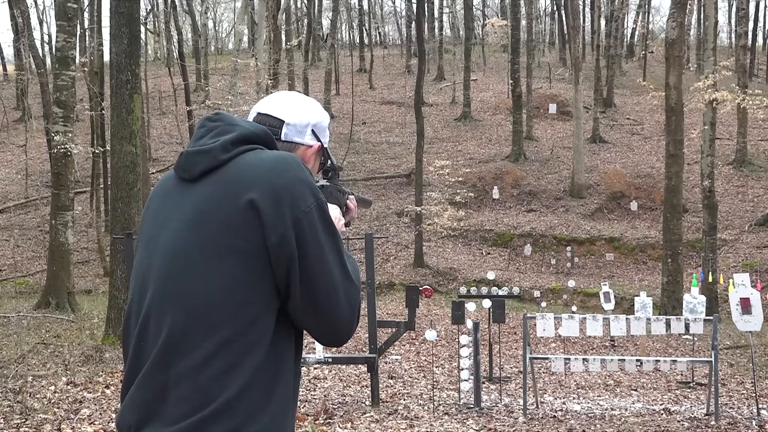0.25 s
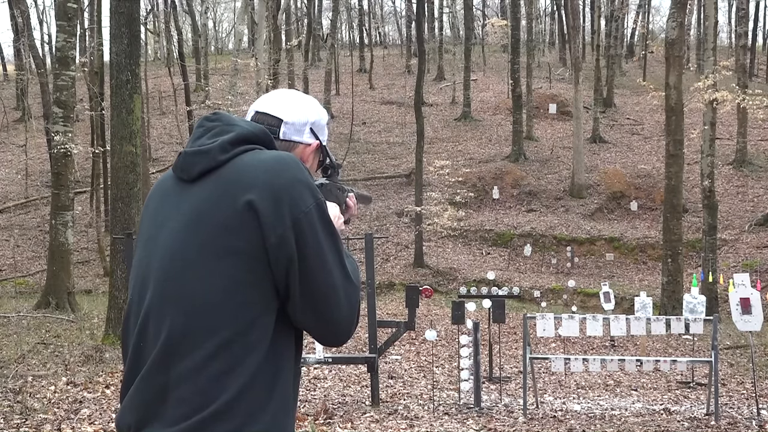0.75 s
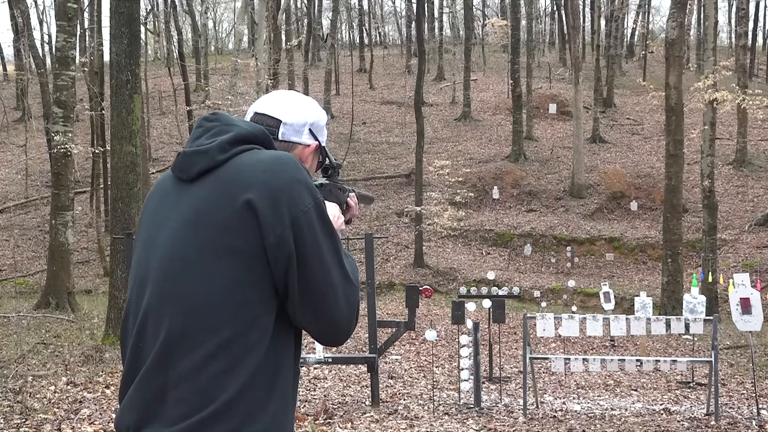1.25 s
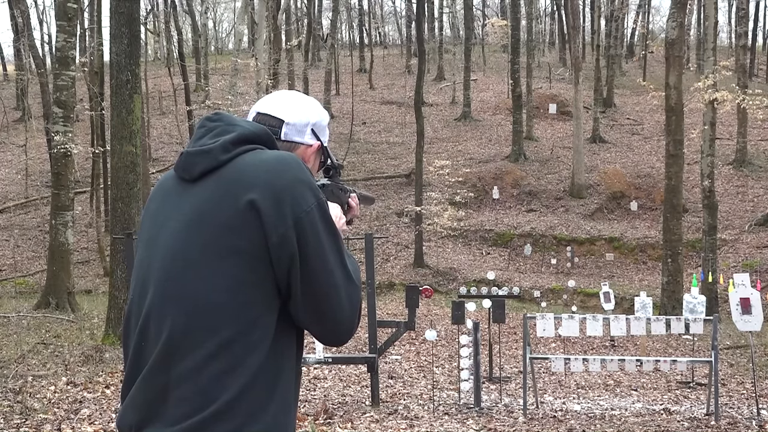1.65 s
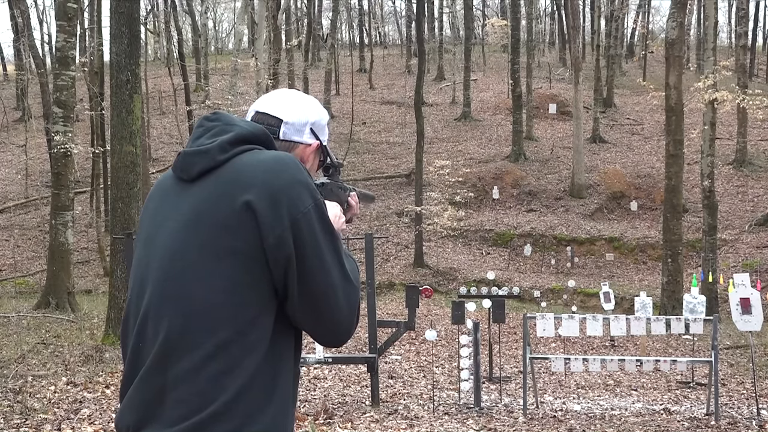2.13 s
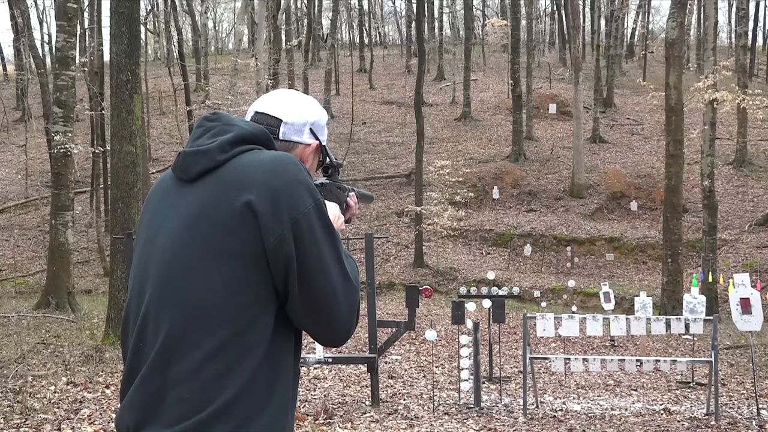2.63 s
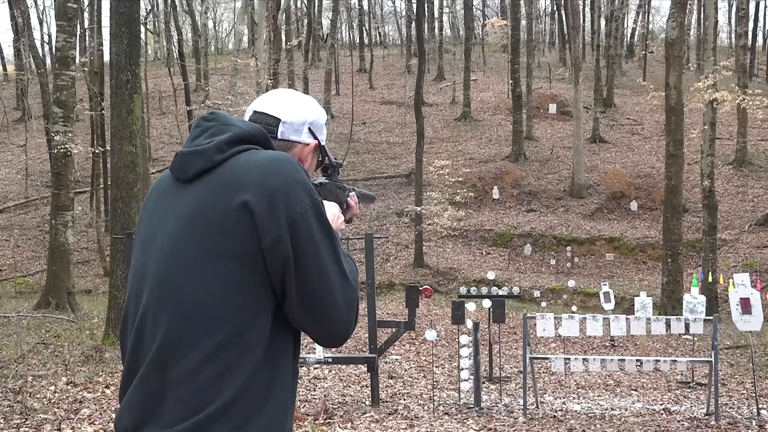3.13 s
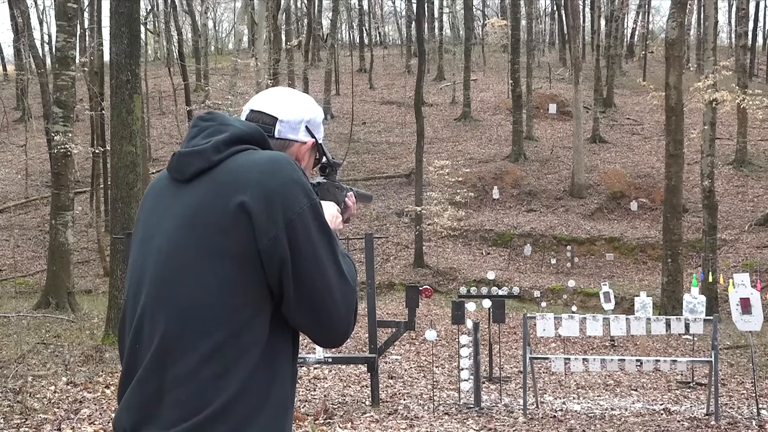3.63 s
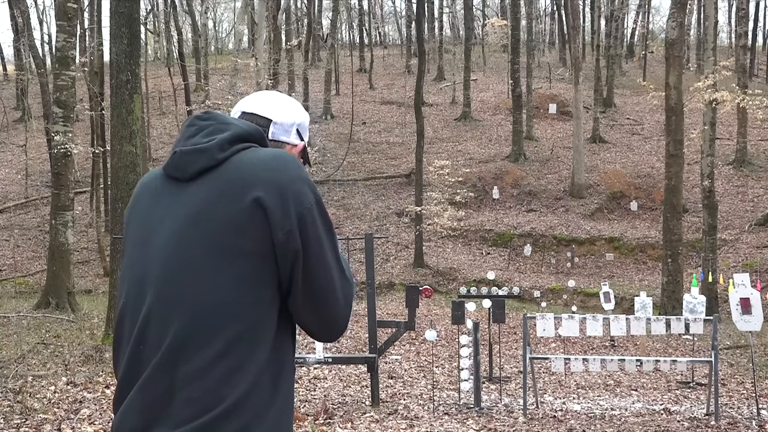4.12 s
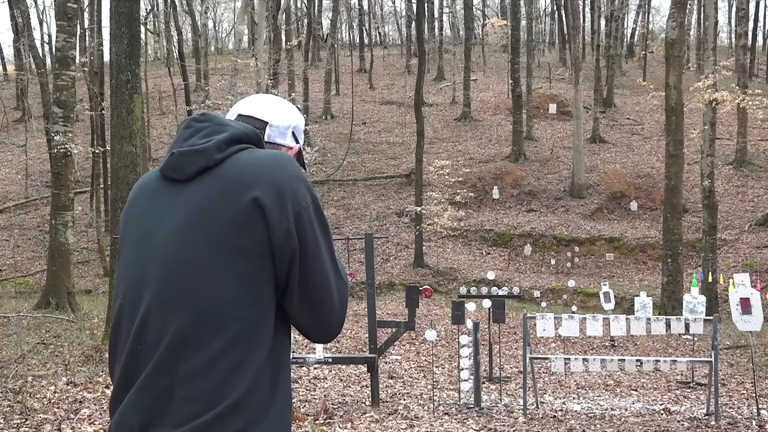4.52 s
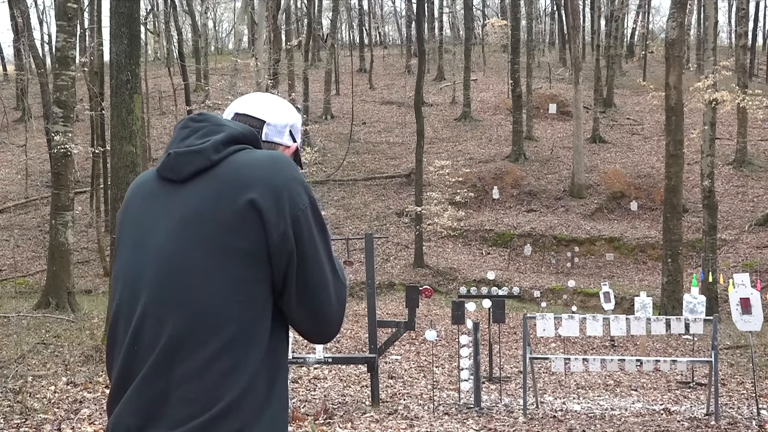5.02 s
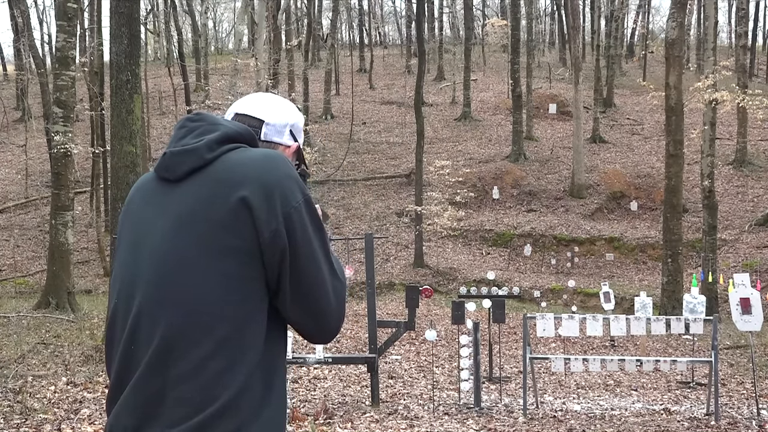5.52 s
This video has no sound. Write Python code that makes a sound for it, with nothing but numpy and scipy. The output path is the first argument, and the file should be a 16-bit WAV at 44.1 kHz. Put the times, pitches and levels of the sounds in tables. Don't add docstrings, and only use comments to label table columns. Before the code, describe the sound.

A suppressed gun fires six times outdoors; blunt blasts and metallic bolt clacks are answered by ringing steel targets and woodland echoes.

```python
import sys
import numpy as np
from scipy import signal
from scipy.fft import rfft, irfft
from scipy.io import wavfile
from scipy.ndimage import uniform_filter1d

SR = 44100
rng = np.random.default_rng(int(sys.argv[2]) if len(sys.argv) > 2 else 0)


def dump(signal):
    limited = np.clip(np.atleast_2d(signal).T, -1, 1)
    pcm = np.round(limited * 32767).astype(np.int16)
    wavfile.write(sys.argv[1], SR, pcm)


def voltage_ratio(level):
    return 10 ** (np.asarray(level, float) / 20)


N = 254016
LEAD = 8192
LONG = N + LEAD
T = np.arange(LONG) / SR


def high_pass(x, hz):
    return signal.sosfilt(signal.butter(2, hz, "high", fs=SR, output="sos"), x)


def band_pass(x, low_hz, top_hz):
    return signal.sosfilt(signal.butter(2, [low_hz, top_hz], "band", fs=SR, output="sos"), x)


def colour(x, points):
    hz, db = np.transpose(points)
    grid = np.maximum(np.arange(1025) * SR / 2048, 1)
    cepstrum = irfft(np.interp(np.log(grid), np.log(hz), db) * np.log(10) / 20)
    cepstrum[1:1024] *= 2
    cepstrum[1025:] = 0
    kernel = irfft(np.exp(rfft(cepstrum)))
    return signal.fftconvolve(x, kernel / np.sqrt(np.sum(kernel ** 2)))[:len(x)]


def ticks(s, db):
    out = np.zeros(LONG)
    np.add.at(out, np.round(np.asarray(s) * SR).astype(int) + LEAD, voltage_ratio(np.asarray(db)))
    return out


def fade(s, db, t60, rise=0.00059):
    out = np.zeros(LONG)
    first = int(np.ceil(s * SR)) + LEAD
    t = T[first:first + int(2 * t60 * SR)] - LEAD / SR - s
    out[first:first + len(t)] = voltage_ratio(db - 60 * t / t60) * (1 - np.exp(-t / rise))
    return out


def ring(x, modes, push=.00002):
    t = T[:SR // 4]
    body = sum(voltage_ratio(db - 60 * t / t60) * np.sin(2 * np.pi * hz * t) for hz, db, t60 in modes)
    return signal.fftconvolve(x, body * (1 - np.exp(-t / push)))[:LONG]


def noise():
    return rng.standard_normal(LONG)


def walk(rate):
    hold = int(SR / rate)
    steps = np.resize(np.repeat(rng.standard_normal(200), hold)[:LONG], LONG)
    return 1.3 * uniform_filter1d(uniform_filter1d(steps, hold), hold)


# (f/Hz, level/dB)
AIR_SPECTRUM = [(15, -62.5), (25, -29.5), (69, 3), (117, -0.5), (145, -11), (862, -22), (1190, -26),
                (3630, -29.5), (4260, -23.5), (8070, -40.5), (14500, -23.5)]


def still_air(db):
    return voltage_ratio(db) * colour(noise(), AIR_SPECTRUM)


# (f/Hz, level/dB, t60/s)
SCATTER = [(150, -79, 9), (330, -66.5, 2.9), (600, -66.5, 3.4), (1200, -70.5, 2.6), (2540, -68.5, 3.24),
           (4440, -68.5, 2.7), (9000, -56.5, 1.06), (14000, -78, 0.18)]
# (t/s after the sound, level/dB, low edge f/Hz, top edge f/Hz)
TRUNK_ECHOES = [(0.0785, -45, 300, 4060), (.0862, -44, 300, 9000), (.0895, -58, 300, 1200),
                (0.1027, -48.5, 1500, 5030), (0.1244, -47.5, 2000, 5230), (0.1543, -46.5, 293, 1820),
                (0.1979, -47, 2510, 4970), (0.244, -74, 300, 3240)]


def wood():
    bark_s, edge_s, side_db = 0.0021, 1.4, -25.5
    t = T[:2 * SR]
    dense, single = np.zeros((2, 2, len(t)))
    for hz, db, t60 in SCATTER:
        band = band_pass(rng.standard_normal(dense.shape), hz / 1.4, min(hz * 1.4, .45 * SR))
        dense += voltage_ratio(db - 60 * t / t60) * band
    dense *= np.exp(-(t / edge_s) ** 2)
    sides = rng.uniform(-1.2, 1, len(TRUNK_ECHOES))
    for (late, db, low_hz, top_hz), side in zip(TRUNK_ECHOES, sides):
        smear = rng.standard_normal(256) * np.exp(-T[:256] / bark_s)
        tap = band_pass(smear, low_hz, top_hz)
        tap /= np.abs(rfft(tap)).max()
        first = int(late * SR)
        single[:, first:first + 256] += voltage_ratio(db) * np.outer([1, side], tap)
    width = np.array([[1], [voltage_ratio(side_db)]])
    return dense * width, single * width


# (t/s, click level/dB, low edge f/Hz, ring level/dB)
BRASS_FALLS = [(0.055, -29, 2490, -64), (0.369, -33, 2460, -93), (0.377, -49, 3000, -57),
               (0.572, -52, 9000, -88), (0.805, -30, 5000, -82), (1.174, -52, 6060, -75.5),
               (2.007, -28, 2020, -99), (2.874, -27.5, 2870, -89), (3.653, -30, 2030, -82),
               (4.172, -40.5, 8000, -95), (5.555, -51, 10000, -60.5)]


def brass():
    ring_hz, ring_t60 = 11650, .45
    tone = np.sin(2 * np.pi * ring_hz * T) * voltage_ratio(1.4 * walk(60))
    out = tone * sum(fade(s, ring_db, ring_t60) for s, _, _, ring_db in BRASS_FALLS)
    grit = noise()
    for s, db, edge_hz, _ in BRASS_FALLS:
        out += fade(s, db, 0.014) * band_pass(grit, edge_hz, 14000)
    return out


# (t/s, level/dB, f/Hz)
DULL_THUMPS = [(.171, -40, 875), (0.179, -39, 172), (0.18, -32.5, 1220), (0.225, -44, 1500),
               (.558, -35, 660), (0.561, -38.5, 930), (.575, -45, 600), (1.175, -39, 1140),
               (3.262, -37.5, 973), (4.702, -51.5, 906)]


def thumps():
    out = np.zeros(LONG)
    for s, db, hz in DULL_THUMPS:
        out += ring(ticks([s], [db]), [(hz, 0, .02), (1.09 * hz, -5, .012)])
    return out


# (t/s, crack level/dB, spray level/dB, spray t60/s)
LEAD_HITS = [
    (0.173, -50, -44, 0.022),
    (0.1821, -28.5, -45.5, 0.053),
    (.902, -43, -54.5, 0.091),
    (0.916, -23, -31.5, 0.12),
    (2.119, -14, -39, 0.36),
    (2.996, -32, -53, 0.26),
    (3.006, -22.5, -44, 0.16),
    (3.767, -21, -40.5, 0.61),
    (4.786, -11, -32, 0.28),
    (5.200, -9, -37, 0.37),
]
# (f/Hz, level/dB)
SPLASH_SPECTRUM = [(120, -39.5), (200, -16.5), (1000, -3.5), (1160, -2.5), (1710, -8), (2200, -10.5),
                   (4400, -6), (5600, -7.5), (8740, -22.5), (16000, -37.5)]


def impacts():
    envelope = np.zeros(LONG)
    for s, crack_db, spray_db, spray_t60 in LEAD_HITS:
        envelope += fade(s, crack_db, 0.0078) + fade(s, spray_db, spray_t60)
    return colour(noise() * envelope, SPLASH_SPECTRUM)


def beating_pair(mode, swell, turn, flutter):
    hz, db, t60, twin_hz, share = mode
    linger_db, linger_times = -17.5, 2
    phase, skip = rng.random(2)
    t = T[:min(int(1.25 * t60 * SR), SR)]
    start = int(skip * LONG)
    here = slice(start, start + len(t))
    decay_db = np.maximum(-60 * t / t60, linger_db - 60 * t / (linger_times * t60))
    level_db = db + decay_db + turn[here] + flutter[here] * np.minimum(t / .2, 1)
    main = np.sin(2 * np.pi * (hz * t + phase))
    twin = np.sin(2 * np.pi * ((hz + twin_hz) * t + phase))
    return voltage_ratio(level_db) * (1 - np.exp(-t / swell)) * (main + share * twin)


# (t/s, swell/s, shimmer level/dB, shimmer t60/s)
STRIKES = [
    (.916, .002, -44.5, 0.16),
    (2.119, 0.0025, -41.5, .3),
    (2.998, 0.00098, -48, .2),
    (3.765, 0.00077, -43.5, 0.39),
    (4.786, 0.002, -31, 0.3),
    (5.200, 0.0094, -25, 0.22),
]
STAKE_F = [668, 735, 1189, 1413, 1454, 2357]
LEFT_F = [801, 1543, 2815, 4410, 4782, 5587, 6612, 7412, 7789, 8513, 9405, 9770, 13035, 13825]
RIGHT_F = [707, 1353, 1391, 1795, 3005, 3606, 5195, 5472, 5565, 8370, 8639, 11990, 12742, 13583]
FAR_F = [773, 1310, 1570, 2208, 3038, 4279, 4395, 5079, 5309, 6551, 6930, 7160, 8392, 8810]
FAR_HIGH_F = [9256, 9907, 10352, 10405, 11555, 12034, 12604, 13330, 13765]
# (level/dB, t60/s, twin offset f/Hz, signed twin share)
STAKE_MODES = [(-59.5, 1, 2.2, 0.7), (-50.5, 1.25, 6.2, 0.7), (-52.5, 1.3, 3.8, 0.3), (-61.5, 1.6, 3, 0.5),
               (-54, 1.3, 4.6, 0.3), (-61.5, 2, 5.0, -0.6)]
LEFT_MODES = [(-39.5, 0.45, 10, 0.3), (-36.8, 0.25, 17.8, -0.28), (-50.5, 0.92, 3.3, 0.65),
              (-40, 0.84, 5.8, 0.95), (-48.2, 0.74, 21.8, 0.57), (-31, 0.19, 4.2, 0.83),
              (-38, 0.2, 16.6, 0.46), (-40, 0.8, 4.1, 0.5), (-36, 0.5, 17.4, -0.75),
              (-34.5, 0.65, 4.3, 0.3), (-33, 0.25, 6.6, 0.9), (-35, 0.42, 5.05, -0.68),
              (-37, 0.25, 10.6, -0.66), (-27, 0.23, 7.9, 0.9)]
RIGHT_MODES = [(-28.5, 0.23, 23.3, -0.65), (-27.5, 0.19, 7, -0.75), (-40.2, 0.52, 2.4, 0.97),
               (-44.5, 1, 2.3, 1), (-32.5, 1.19, 2.5, 0.5), (-39, 0.63, 3.6, 0.84), (-36, 0.78, 2.8, 0.81),
               (-18.5, 0.15, 33, -1.1), (-39, 0.65, 3.4, 0.7), (-19.5, 0.16, 6.8, 0.7),
               (-17.5, 0.26, 11.4, 1), (-27.5, 0.35, 12.6, 0.7), (-42.0, 0.36, 9.0, 0.3),
               (-19, 0.12, 21.8, 0.9)]
# (t60/s, twin offset f/Hz, signed twin share)
FAR_MODES = [(1.2, 3.5, -0.7), (0.71, 1.0, -1.3), (1.6, 4, 0.64), (1.8, 2, -0.3), (1.25, 7.8, -0.65),
             (1.5, 2.5, -1.1), (1.25, 3.1, 0.5), (0.88, 1.8, 0.3), (1, 10.6, 0.86), (0.65, 3.4, 0.66),
             (1, 3.7, 0.3), (0.8, 2.2, 0.18), (0.77, 5, 0.45), (0.61, 3.4, 0.86),
             (0.5, 1.9, 1), (0.65, 19.4, 0.3), (0.65, 13, -0.3), (0.66, 11.0, -0.3), (0.37, 19.0, 0.1),
              (0.65, 11.0, -0.4), (0.5, 5.0, 0.3), (0.5, 3.0, 0.4), (0.35, 16.2, -0.5)]
# (level/dB at first, second, third far strike)
FAR_LEVELS = [(-53, -64.5, -55), (-41, -62.5, -47.5), (-51.5, -69, -50), (-53, -64.5, -48),
              (-50, -65.0, -33), (-41, -78.5, -51), (-58.5, -78.5, -46.5), (-23.5, -42.5, -41),
              (-35, -67, -39), (-66, -78, -45.5), (-50, -71.5, -48), (-56.5, -66, -80), (-36, -65, -44),
              (-37.5, -59.5, -43),
              (-39.5, -60.5, -52), (-44.5, -62, -57), (-49.5, -59, -49.5), (-44.5, -61, -48.5),
               (-46.5, -87, -48), (-57, -79, -52), (-53.5, -62, -40), (-54.5, -72.5, -73.5),
               (-42.5, -78, -85.4)]
FAR_RATIO = [1, 1.005, 1.003]


def plates():
    far_rows = list(zip(FAR_F + FAR_HIGH_F, FAR_MODES, FAR_LEVELS))
    far = [[(hz * ratio, db[k], *twin) for hz, twin, db in far_rows] for k, ratio in enumerate(FAR_RATIO)]
    stake = [(hz, *row) for hz, row in zip(STAKE_F, STAKE_MODES)]
    left = [(hz, *row) for hz, row in zip(LEFT_F, LEFT_MODES)]
    right = [(hz, *row) for hz, row in zip(RIGHT_F, RIGHT_MODES)]
    turn = np.tile(.8 * walk(5.5), 2)
    flutter = np.tile(3 * walk(65), 2)
    out = np.zeros(LONG)
    for (s, swell, shimmer_db, _), modes in zip(STRIKES, [stake, *far, left, right]):
        first = int(s * SR) + LEAD
        overtones = [(4000 + 11000 * a, shimmer_db - 12 - 8 * b, 0.25 * (1.5 - a), 5 + 30 * b, .7)
                     for a, b in rng.random((26, 2))]
        for mode in [*modes, *overtones]:
            pair = beating_pair(mode, swell, turn, flutter)[:LONG - first]
            out[first:first + len(pair)] += pair
    shimmer = noise() * sum(fade(s, db, t60, swell) for s, swell, db, t60 in STRIKES)
    return out + colour(shimmer, [(2500, -29.5), (5000, -13.5), (9000, 7.5), (13500, 0.5), (16000, -11.5)])


# (t/s, level/dB)
BLASTS = [
    (-0.0926, 0),
    (0.6550, 1),
    (1.8552, 0),
    (2.7336, -1),
    (3.5034, 0),
    (4.7337, 1),
    (5.1471, -1),
]
# (f/Hz, level/dB, t60/s)
TUBE_MODES = [(193, -6, 0.0078), (378, 3.5, 0.0049), (622, 21, 0.0039), (1000, -14, 0.095),
              (5230, -5, 0.0052)]
# (f/Hz, level/dB, t60/s)
CRACK_MODES = [(1500, 5.5, 0.0018), (2410, -10.5, 0.0061), (3932, -1.5, 0.0023)]


def muzzle():
    s, db = np.transpose(BLASTS)
    direct = ticks(s, db)
    bounce = ticks(s + .0032, db - 5)
    blast = high_pass(ring(direct + bounce, TUBE_MODES, .001), 150)
    return blast, blast + voltage_ratio(20) * ring(direct, CRACK_MODES)


# (t/s after the blast, level/dB, t60/s)
GAS_CYCLE = [
    (-.0042, -20, 0.073),
    (-.0011, -3, 0.017),
    (.0034, 10, 0.0088),
    (.0092, -13, 0.0026),
    (0.0096, -15.5, .09),
    (0.014, -13, 0.0057),
]
# (f/Hz, level/dB)
GAS_SPECTRUM = [(710, -32.5), (1200, -4), (2130, -4.5), (3740, -0.5), (4410, 2), (8630, -2), (12700, -1),
                (16000, -7)]


def gas_jets():
    envelope = np.zeros(LONG)
    for s, db in BLASTS:
        for late, step_db, t60 in GAS_CYCLE:
            envelope += fade(s + late, db + step_db, t60)
    return colour(noise() * envelope, GAS_SPECTRUM)


# (t/s, peak level/dB)
BOLT_STOPS = [(0.687, -7), (0.704, -12.5), (1.886, -6.5), (1.905, -14.5), (2.764, -4.5), (2.781, -13),
              (3.536, -5), (3.553, -13), (4.765, -3.5), (5.18, -7.5), (4.782, -13.5), (5.196, -10)]
# (f/Hz, level/dB)
CLACK_SPECTRUM = [(120, -44.5), (200, -6.5), (482, 0), (749, 2), (1020, 0), (1270, -6.5), (2610, 0),
                  (3430, -8.5), (4520, -2.5), (8120, -1), (16000, -14.5)]
# (t/s after the blast, level/dB)
STEEL_KNOCKS = [
    (.0093, 0),
    (0.0165, -7.5),
]
# (f/Hz, level/dB, t60/s)
STEEL_MODES = [(498, -17.5, 0.053), (989, -17, 0.052), (3500, 1.5, 0.0042), (5680, -9.5, .016),
               (8130, -11.5, 0.017)]


def bolt():
    lag_s = .001
    envelope = sum(fade(s + lag_s, db - 6, .012) + fade(s + lag_s, db - 17, 0.065) for s, db in BOLT_STOPS)
    clack = colour(noise() * envelope, CLACK_SPECTRUM)
    s, db = np.transpose(BLASTS)
    knocks = sum(ticks(s + late, db + knock_db) for late, knock_db in STEEL_KNOCKS)
    s, db = np.transpose(BOLT_STOPS)
    return clack + ring(knocks + ticks(s + lag_s, db - 4.0), STEEL_MODES)


def gun():
    blast, forward = muzzle()
    action = gas_jets() + bolt()
    return blast + action, forward + voltage_ratio(2) * action


def scene():
    air_db = -69.5
    dense, single = wood()
    small = brass() + thumps()
    splash, steel = impacts(), plates()
    near, forward = gun()
    echo = signal.fftconvolve((voltage_ratio(23.0) * splash + voltage_ratio(5) * steel)[None], dense)[:, :LONG]
    late_rise = 1 - np.exp(-(T[:2 * SR] / 0.17) ** 2)
    gun_response = single + voltage_ratio(-9.5) * dense * late_rise
    echo += signal.fftconvolve(forward[None], gun_response)[:, :LONG]
    mid = near + splash + steel + small + echo[0] + still_air(air_db)
    side = 0.045 * near + .05 * (splash + steel + small) + echo[1] + still_air(air_db - 15.5)
    side += 0.023 * np.roll(near + steel, 2)
    return np.array([mid + side, mid - side])[:, LEAD:]


def roll_off(x):
    return signal.sosfilt(signal.butter(12, 16460, fs=SR, output="sos"), x)


def record(dry):
    clipped = np.clip(high_pass(dry, 60), -.93, .93)
    coupled = high_pass(clipped, 70)
    top_cut = signal.ellip(8, .2, 50, 16000, fs=SR, output="sos")
    return roll_off(signal.sosfilt(top_cut, coupled))


dry = scene()
out = record(dry)
dump(out)
```